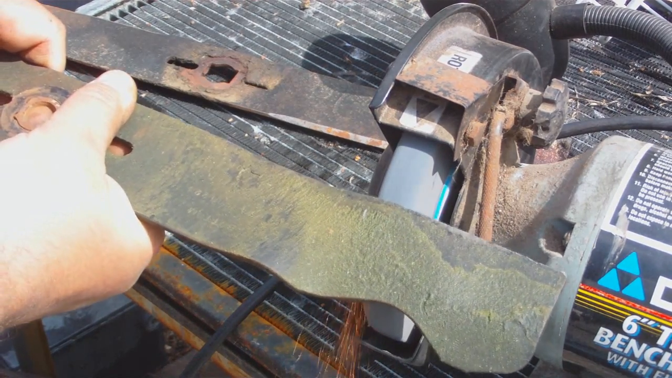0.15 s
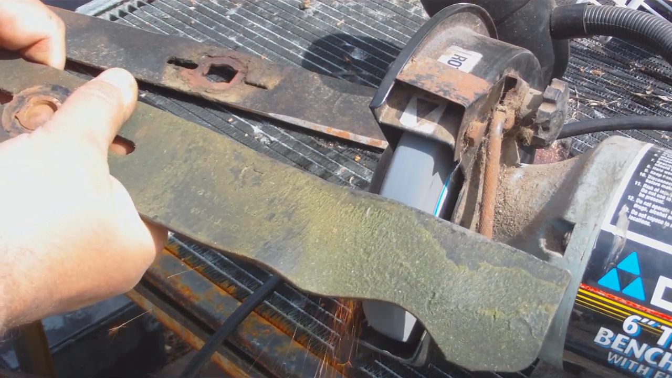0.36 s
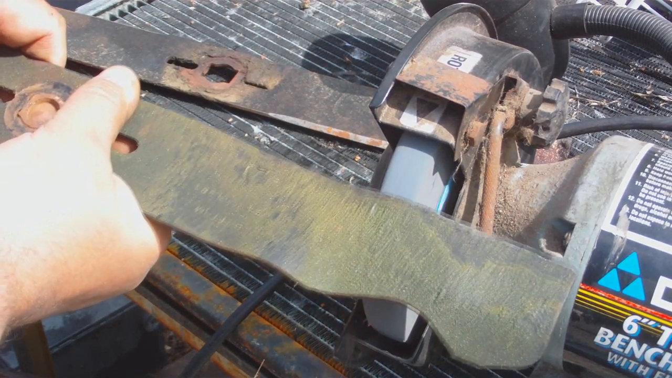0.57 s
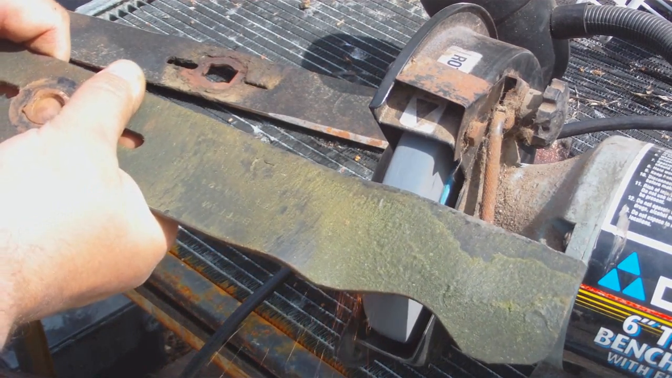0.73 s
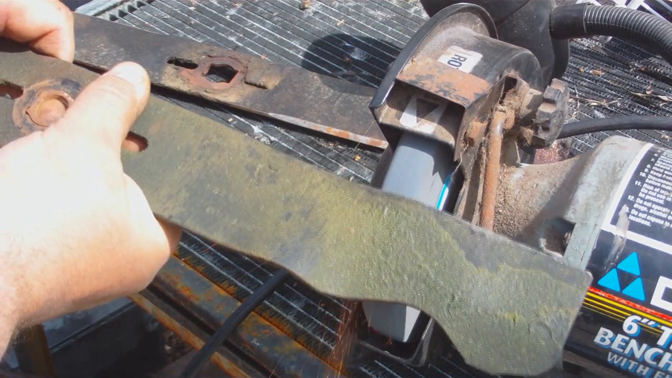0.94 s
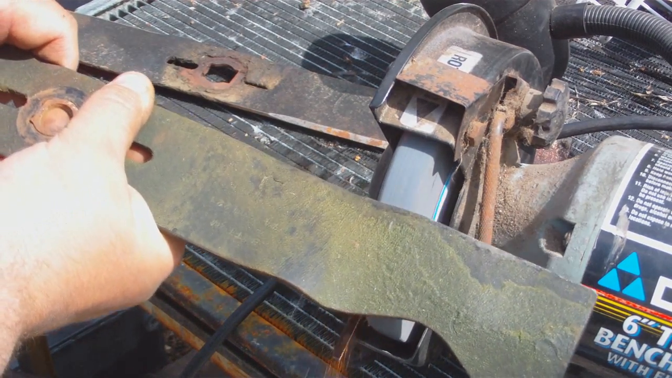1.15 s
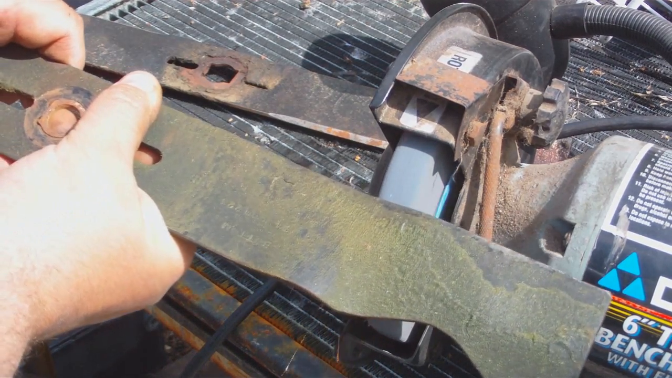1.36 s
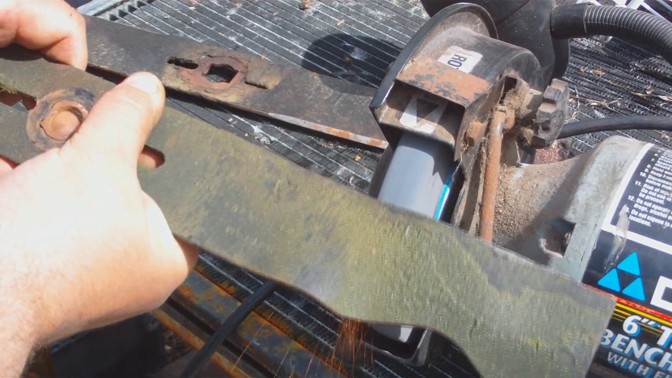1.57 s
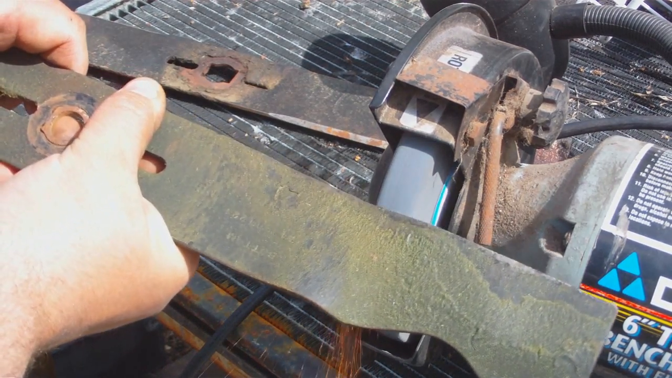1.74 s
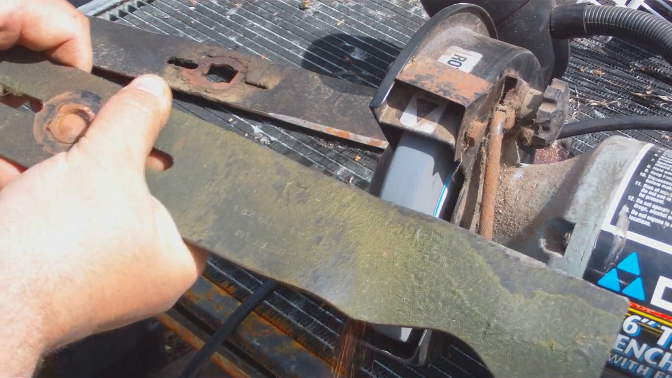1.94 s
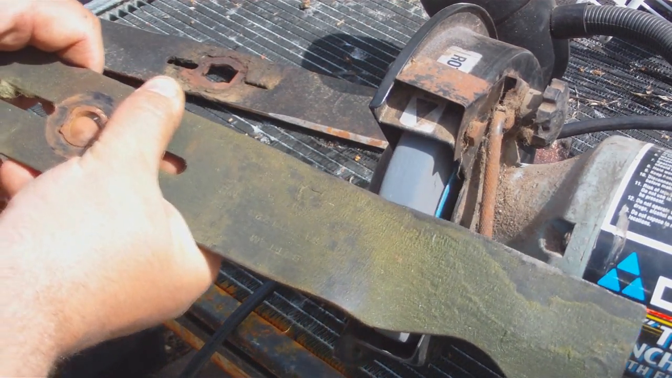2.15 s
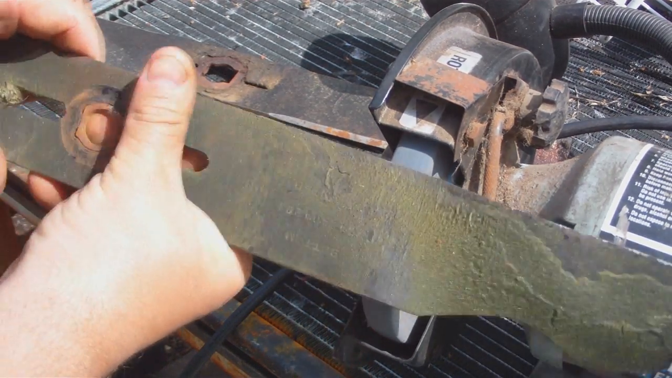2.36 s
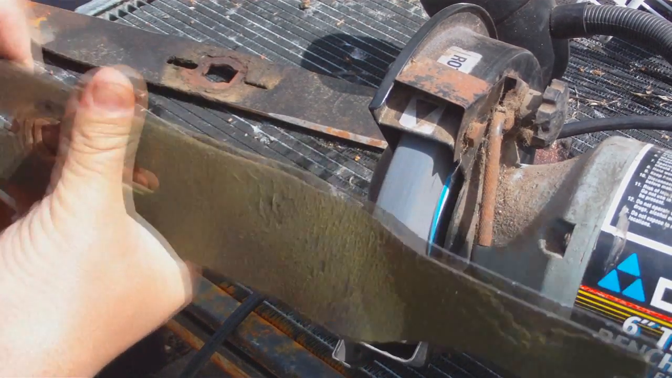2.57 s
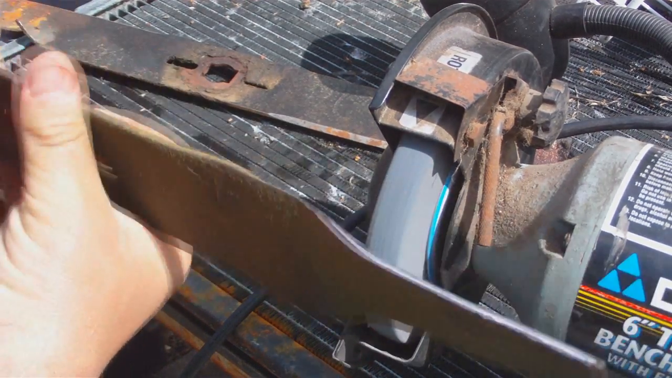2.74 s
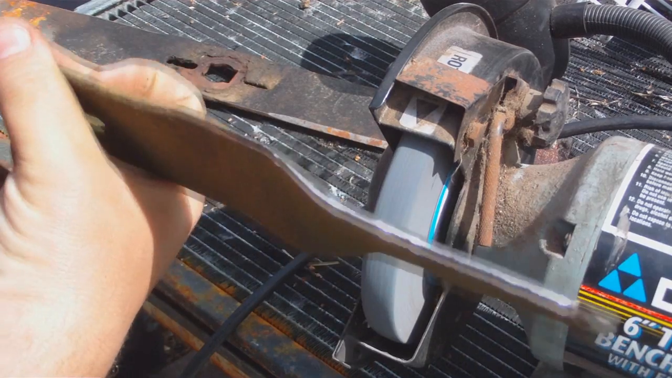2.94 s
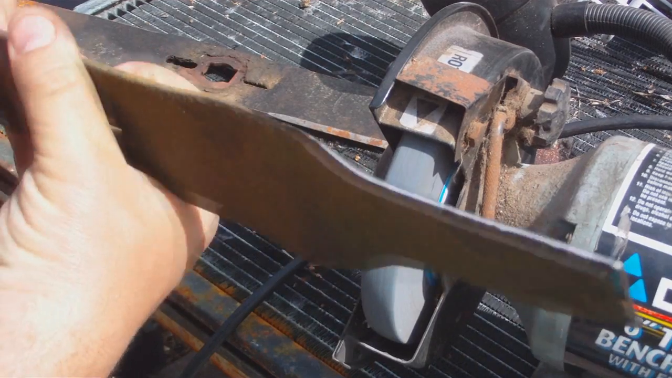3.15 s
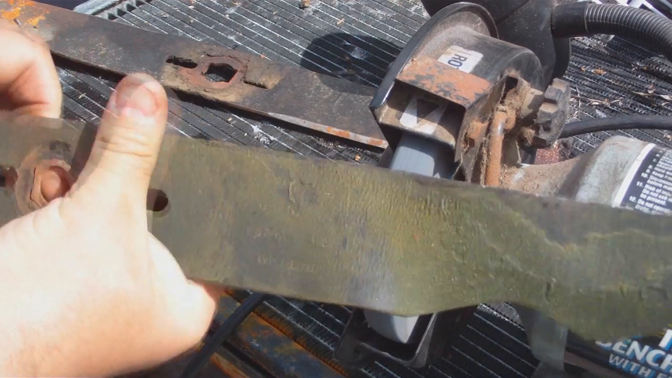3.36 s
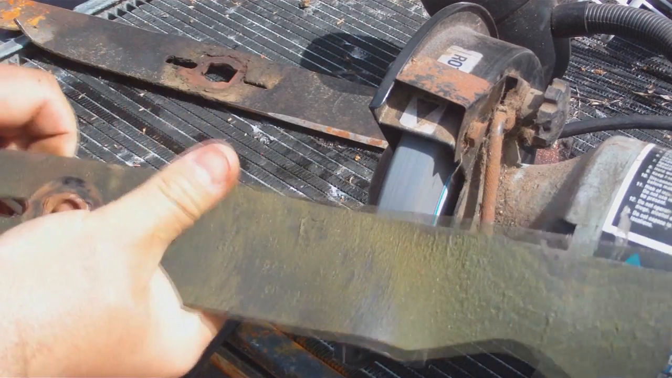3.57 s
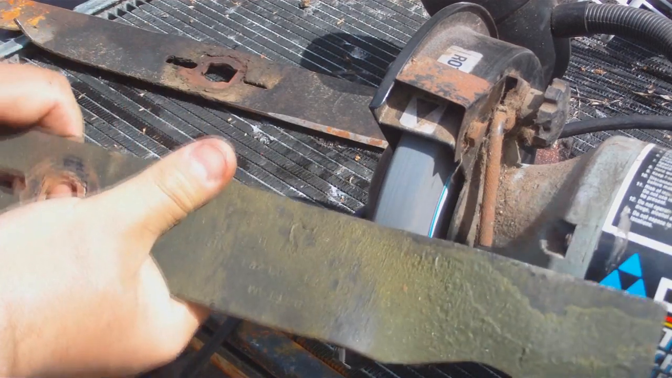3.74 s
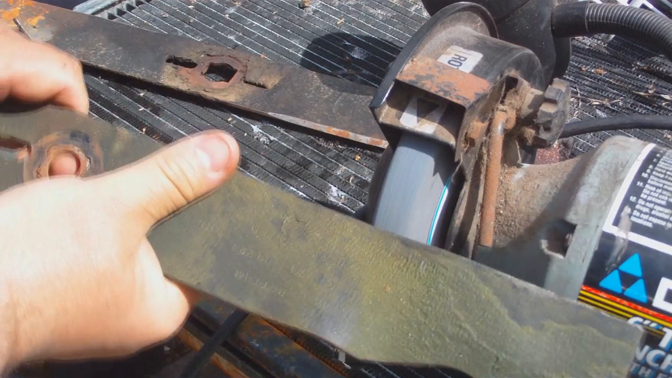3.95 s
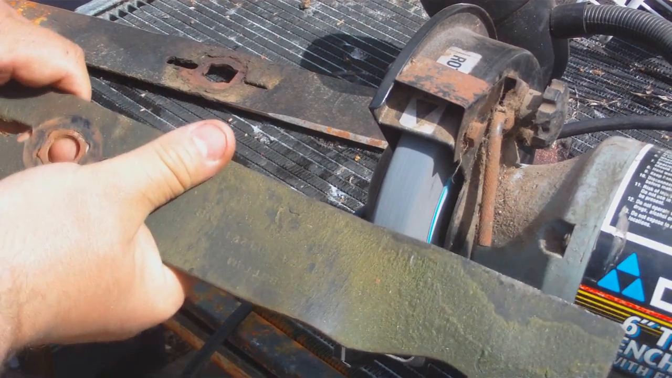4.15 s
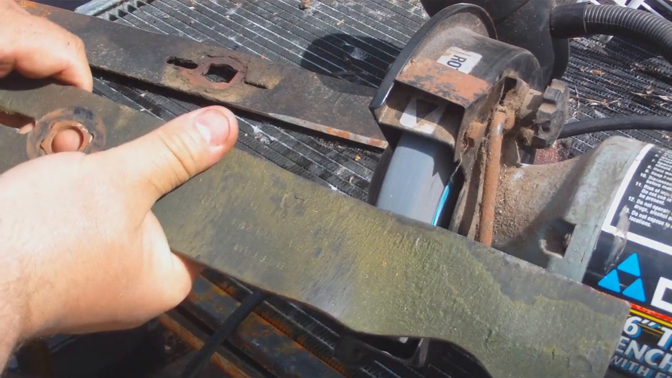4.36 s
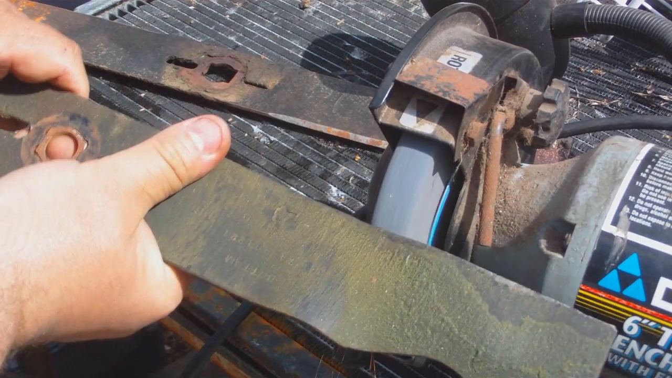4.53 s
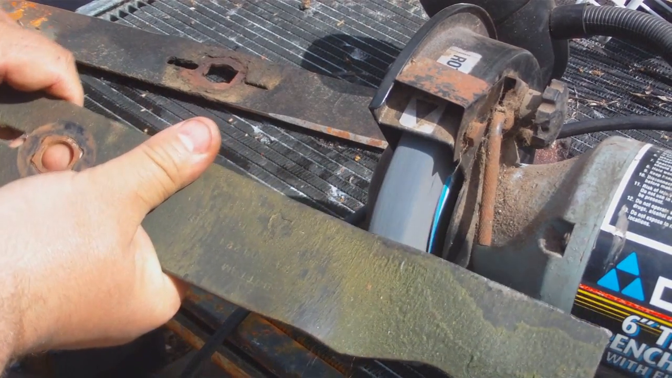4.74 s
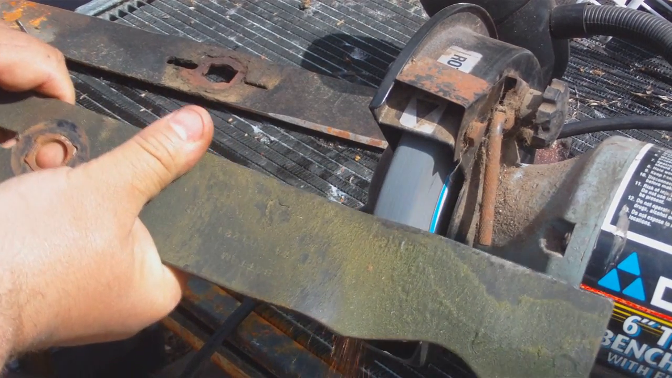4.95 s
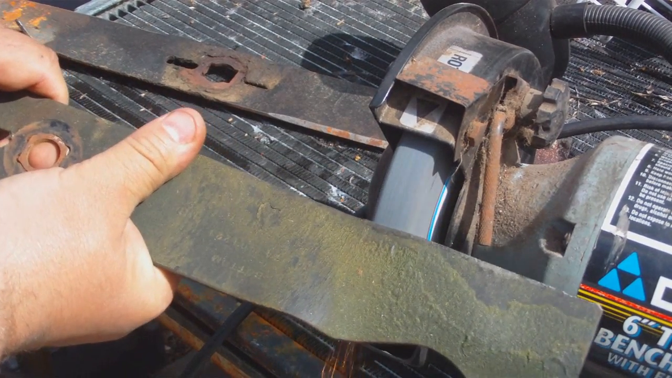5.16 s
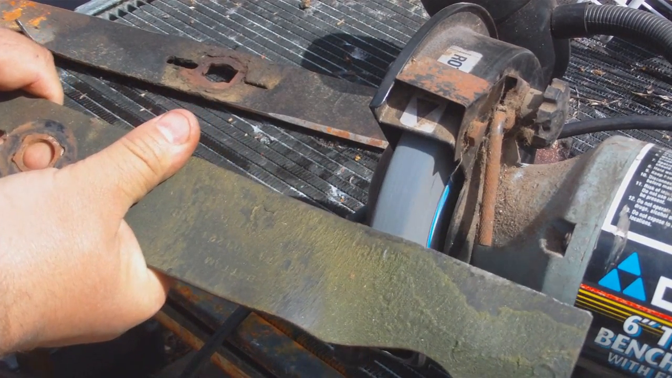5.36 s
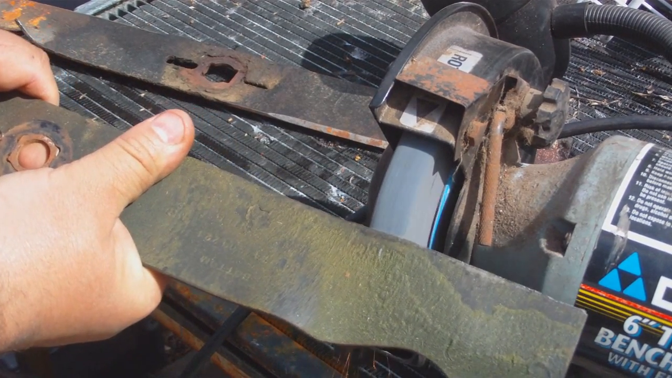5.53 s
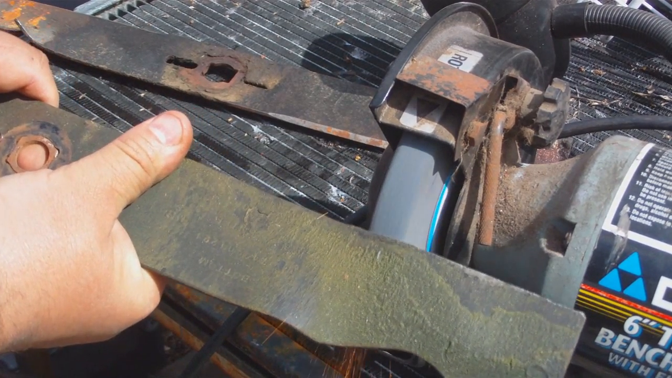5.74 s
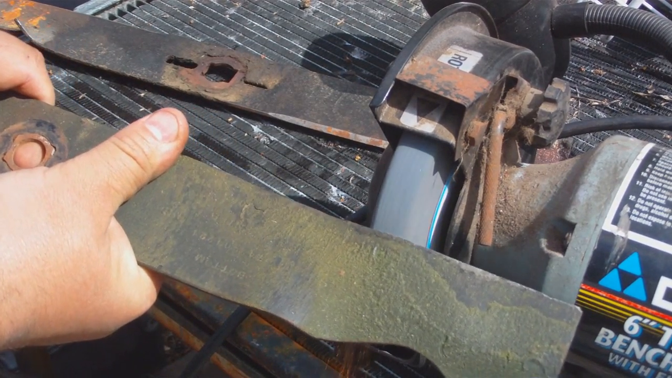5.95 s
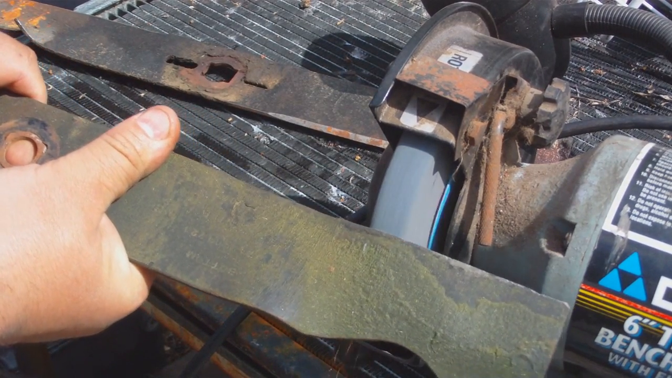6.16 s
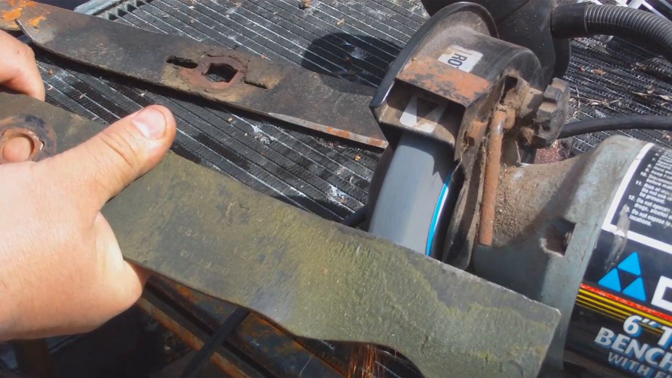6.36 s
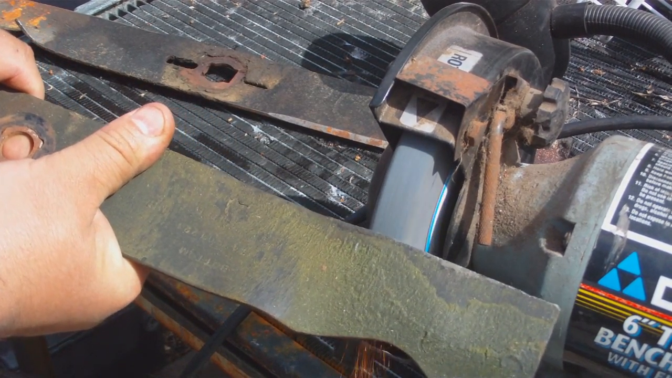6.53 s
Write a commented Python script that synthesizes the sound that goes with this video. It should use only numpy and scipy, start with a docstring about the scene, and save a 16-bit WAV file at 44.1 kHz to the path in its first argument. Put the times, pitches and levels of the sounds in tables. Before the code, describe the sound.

A steel blade grinds harshly on a bench grinder wheel, lifts off to leave the motor humming, then clatters back and grinds again.

```python
"""Sharpening a mower blade

A long steel blade is held to a bench grinder, outdoors and close to the microphone. The wheel is
slightly out of round, so the blade lands on it once a turn and the same grit scratches it into ringing.
Between two passes the motor runs free and the lifted blade bumps softly as it is handled, then bounces
as it comes back down. A light breeze buffets the microphone."""
import sys
import numpy as np
from scipy import signal
from scipy.fft import rfft, irfft
from scipy.io import wavfile
from scipy.ndimage import uniform_filter1d, map_coordinates

SR = 44100
rng = np.random.default_rng(int(sys.argv[2]) if len(sys.argv) > 2 else 0)


def digitize_waveform(pressure):
    """Quantize a signal to 16-bit integers and store it at the path in sys.argv[1].

    Rows of a 2-D input are taken as channels; values are limited to [-1, 1].
    """
    field = np.atleast_2d(pressure).T
    bounded = np.clip(field, -1, 1)
    quanta = np.round(bounded * 32767).astype(np.int16)
    wavfile.write(sys.argv[1], SR, quanta)


N = 291060
TIME = np.arange(N) / SR

# The wheel's speed, which sags under load: (time [s], speed [turns/s])
WHEEL_SPEED = [(0, 58.5), (.6, 58.4), (.8, 58.6), (2.35, 58.6), (2.5, 59.57), (4.5, 59.57), (4.75, 59.1),
               (5.3, 58.7), (5.75, 58.4), (6.6, 58.35)]
# Passes along the edge, where place 0 is the inner end and 1 is the tip: (start [s], end [s],
# relative level [dB], first place [0-1], last place [0-1], time to press home [s],
# landing angle once home [turns], rocking [0-1], extra ring of the gripped modes [dB])
GRINDING_PASSES = [(0, 2.335, -14, 0.012, 0.93, 0, .48, .4, -4.5),
                   (4.616, 6.6, -14, 0.74, 0.31, .72, .55, .15, 2)]
# Single knocks of the blade on the wheel: (time [s], relative level [dB], decay time [s])
BLADE_KNOCKS = [(2.354, 2, 0.0012), (2.379, -9, 0.0018), (2.393, -15, 0.0017), (4.502, 4, 0.00097),
                (4.5379, 3.5, 0.00069), (4.5678, -2.5, 0.0022), (4.5732, -1, 0.00067), (4.5909, -1, 0.0005),
                (4.6055, 3, 0.00078), (4.6236, 2.5, 0.00059), (4.874, -0.5, 0.0011), (4.923, -4, 0.0011),
                (4.994, -1, 0.0016)]
# The blade's modes, the tones it rings at: (pitch [Hz], width [Hz], then its relative level at
# each of four places from inner end to tip [dB])
BLADE_MODES = [(533, 60, -48, -46, -26.5, -12), (933.5, 25, -16.5, -18.5, -16.5, -16.5),
               (1042, 63, -15, -18, -19, -11), (1270.6, 53, -14, -13, -11.5, -10.5),
               (1463, 190, -12, -18.5, -13, -10), (2056, 100, -4, -5, -6, -4),
               (2238, 300, -11, -11, -10.5, -8.5), (2530, 53, -9, -11.5, -9.5, -13),
               (2816, 42, -18, -20.5, -8, -15), (3367, 36.6, -6, -4, -5.5, -13),
               (3945, 57, -5.5, -11, -19.5, -30), (4110, 125, -4.5, -7.5, -17, -53),
               (4466, 18, -13.5, -5.0, -19, -25), (4996, 79, -31, -10.5, -7, -4.5),
               (5224, 230, -30, -17.5, -6.5, -16), (5730, 93, -18, -10, -15, -17.5),
               (6224, 110, -12.5, -18, -16, -18), (6516, 70, -1, -11.5, -7, -10),
               (6830, 150, -7.5, -7, -14.5, -12.5), (7147, 146, -2, -1.5, -1.5, -16),
               (7320, 150, -2, -45, -12, 0), (7716, 290, -28, -37, 1, -4),
               (8160, 57, -21, -11.5, -3.5, -26), (8460, 66, -7, -7.5, -14, -10.5),
               (9997, 94, -9, -17.5, -6, -8), (11020, 120, -33.0, -33, -9, -10),
               (11030, 590, -13.5, -17.5, -3.5, -30), (12500, 150, -25.0, -29, -30.0, -38.0),
               (13484.0, 150, -39, -35.0, -27, -24), (14650, 110, -15, -34, -28, -23)]
# Modes that the grip damps or leaves free: (pitch [Hz], width [Hz], response to the grip [factor])
GRIP_BANDS = [(3365, 200, 0.51), (6600, 120, 3.7), (2800, 100, 0.46), (8310, 230, -0.55),
              (13484, 150, -1.6), (14650, 300, -0.5)]
# The balance of the ring, one curve a pass: (time [s], low modes [dB], treble modes [dB])
RING_BALANCE = [
    [(0.05, -31, -16.5), (0.21, -21.5, -27), (0.43, -24, -17.5), (0.6, -24, -25.5), (0.93, -26, -20),
     (0.98, -23.5, -24), (1.57, -23, -14), (1.68, -18.5, -18), (2.3, -30, -20)],
    [(4.62, -22, -15.5), (4.64, -28, -15.5), (4.834, -24.5, -18.5), (5.194, -26, -19),
     (5.324, -26.5, -29.5), (5.474, -27.5, -20.5), (5.818, -30.5, -20.5), (5.85, -27, -23.5),
     (6.55, -29, -19)],
]
# Quickly dying resonances of a sharp tap: (pitch [Hz], width [Hz], relative level [dB])
CRACK_MODES = [(5074, 150, 20), (8100, 2200, 8), (11160, 250, -18)]
# The grit's own dull rasp: (frequency [Hz], relative level [dB])
RASP_SPECTRUM = [(100, -100), (400, -6.5), (800, -7), (2000, 1.5), (4000, 2), (8000, -20), (11000, -17),
                 (15000, -12.5)]
# The steel's sound loses its highest treble: (frequency [Hz], relative level [dB])
STEEL_TREBLE = [(9000, 0.5), (11000, -1.5), (12500, 0), (15000, -4.5)]
# Housing resonances that the bearings rattle: (pitch [Hz], width [Hz], level [dB])
HOUSING_MODES = [(1414, 110, -40), (1900, 200, -50), (2995, 320, -46.5), (3400, 180, -50.5),
                 (3780, 67, -51.5), (4440, 40, -71), (5540, 380, -58), (7680, 81, -55), (8360, 27, -57.5),
                 (10430, 140, -53.5), (11430, 59, -51.5)]
# Air dragged round by the wheels: (frequency [Hz], relative level [dB])
AIR_SPECTRUM = [(15, -46), (25, -16), (107, -15), (204, -4.5), (227, -12), (433, -5), (509, -3.5),
                (582, 2.5), (1200, -12), (2010, -10.5), (2560, -19), (3530, -25), (5280, -30), (11500, -27),
                (15500, -50)]
# Buzz under load: (pitch [times wheel speed], relative level in pass one [dB], in pass two [dB])
LOAD_TONES = [(0.98, -53, -50.5), (3, -37, -37.5), (3.625, -43, -38), (4.03, -39, -42.5),
              (8.05, -33.5, -36.5), (8.94, -35, -42), (15.02, -34.5, -31), (16, -29.5, -40),
              (19.12, -31, -63), (22, -29, -45), (25, -48, -53)]
# Hum of the free-running machine: (pitch [times wheel speed], level [dB])
FREE_TONES = [(1, -50), (4, -44), (5, -51), (6, -44), (7, -42.5), (7.5, -42), (8, -47.5), (10, -42),
              (15, -45), (18.43, -47), (23, -48.5), (24, -53), (30, -52), (33, -51), (38.95, -54.5),
              (47, -56.5), (50, -48.5), (58, -47), (77, -60)]
# The rumble of wind on the microphone: (frequency [Hz], relative level [dB])
WIND_SPECTRUM = [(15, -21), (40, 4), (75, 5), (140, 2), (280, -6), (600, -46), (2000, -80)]
# Gusts of wind: (time of the peak [s], level [dB], half length [s])
WIND_GUSTS = [(.04, -38.5, 0.073), (0.297, -40.5, 0.15), (1.46, -38, .05), (2.123, -39.5, 0.13),
              (2.49, -37, .14), (4.1, -33, .05), (4.328, -40, 0.13), (4.62, -42.5, .16)]
# Dull bumps as the blade is handled: (time [s], level [dB], pitch [Hz])
HANDLING_BUMPS = [(3.301, -18, 80.4), (3.345, -17.5, 137), (4.07, -20.5, 70), (4.115, -22, 125)]

ATTACK_S, RELEASE_S = 0.0014, 0.014  # the steel bites, and comes clear
STROKE_EASE = 0.82  # 0 = the hand slides at one speed, 1 = it starts and ends at rest
PRESS_S, GRAZE_TURNS = .57, 1.02  # time for the weight to come on; landing angle before it does
GRAZE_DAMP_DB = 2  # the gripped modes ring less while the blade only grazes
HIGH_SPOT_TURNS = .89  # where the wheel bulges
ROCK_CHANGES_PER_S, ROCK_SPREAD = 5, .55  # the rocking comes and goes
TREMORS_PER_S, TREMOR_DB = 35, 0.38  # the hand's force is never quite steady
TILT_INNER_DB, TILT_TIP_DB = -0.5, -0.75  # brightness per octave at the two ends of the edge
LOW_TOP_HZ, TREBLE_FROM_HZ, MIDDLE_DB = 1700, 5900, -15  # the middle modes' range and relative level
CALM_DB, CALM_FALL_DB_PER_S = -46.5, -1.4  # the breeze between gusts slowly drops
EDDIES_PER_S, EDDY_DB = 24, 5


def amp(db):
    """Turns decibels into a gain."""
    return 10 ** (np.asarray(db) / 20)


def unit(x):
    """Scales a signal to an average (rms) level of 1."""
    return x / np.sqrt(np.mean(x ** 2) + 1e-20)


def follow(rows, t=TIME):
    """Reads every column of a curve at the times t."""
    times, *columns = np.transpose(rows)
    return [np.interp(t, times, column) for column in columns]


def local_rms(x, size):
    """The running average level over about size samples."""
    return np.sqrt(abs(uniform_filter1d(uniform_filter1d(x ** 2, size), size)) + 1e-12)


def colour(x, points):
    """Shapes the tone by (Hz, dB) points; white noise would keep its power."""
    hz, db = np.transpose(points)
    gain = amp(np.interp(np.log(np.fft.rfftfreq(N, 1 / SR) + 1), np.log(hz), db))
    return irfft(rfft(x) * unit(gain), N)


def drift(rate):
    """Smooth random wandering, about 1 in size, with rate changes a second."""
    knots = rng.standard_normal(400)
    coarse = TIME[::200]
    return np.interp(TIME, coarse, map_coordinates(knots, [coarse * rate], mode="mirror"))


def resonate(x, hz, width):
    """Rings one mode: the narrower its width, the longer it rings."""
    return signal.lfilter(*signal.iirpeak(min(hz, SR / 2 - 1), hz / width, SR), x)


def blows(times, sizes, decay):
    """The force of some blows: each rises at once and dies away."""
    force = np.zeros(N)
    inside = (times > 0) & (times < TIME[-1])
    np.add.at(force, (times[inside] * SR).astype(int), sizes[inside])
    return signal.lfilter([1], [1, -np.exp(-1 / (decay * SR))], force)


def roughness(angle, renewal, fresh, size=750):
    """A turning surface repeats every turn, wears anew renewal times a second and adds fresh noise."""
    tracks = rng.standard_normal((96, size))
    track, worn = np.divmod(TIME * renewal, 1)
    track, spot = track.astype(int), (angle * size).astype(int) % size
    old, new = tracks[track % len(tracks), spot], tracks[(track + 1) % len(tracks), spot]
    repeating = old * np.cos(worn * np.pi / 2) + new * np.sin(worn * np.pi / 2)
    return unit(repeating + fresh * rng.standard_normal(N))


def hand_stroke(t=TIME):
    """The hand presses the blade home and slides its edge across the wheel."""
    rows = np.array(GRINDING_PASSES)
    nearest = np.searchsorted((rows[:-1, 1] + rows[1:, 0]) / 2, t)
    start, end, db, first, last, home_s, seated, rocking, freed_db = rows[nearest].T
    gain = amp(db) * np.clip((t - start) / ATTACK_S, 0, 1) * np.clip(1 - (t - end) / RELEASE_S, 0, 1)
    done = np.clip((t - start) / (end - start), 0, 1)
    done += STROKE_EASE * (np.sin(np.pi / 2 * done) ** 2 - done)
    place = first + (last - first) * done
    grazing = np.clip((start + home_s - t) / PRESS_S, 0, 1) ** 2
    landing = seated + (GRAZE_TURNS - seated) * grazing
    return gain, place, landing, rocking, freed_db - GRAZE_DAMP_DB * grazing ** 2


def contact_force(angle):
    """Each turn the blade lands, rebounds, is struck by the high spot and drags on behind it."""
    turn = np.arange(-1, 400)
    when = lambda at: np.interp(turn + at, angle, TIME)  # the time each turn reaches this angle
    _, _, landing, rocking, _ = hand_stroke(when(0.9))
    wander = np.interp(when(0.89), TIME, drift(ROCK_CHANGES_PER_S))
    rocking = np.clip(rocking * (1 + ROCK_SPREAD * wander), 0, 1)
    pressed = np.clip((1.06 - landing) / 0.41, 0, 1)  # a lightly held blade is only tapped
    chance = rng.standard_normal((len(turn), 5)).T
    swing = rocking * (-1.) ** turn  # a rocking blade lands late and hard, then early and softly
    landing = landing + .09 * swing + 0.015 * chance[0]
    crest = np.maximum(HIGH_SPOT_TURNS + .005 * chance[1], landing + 0.015)
    land = blows(when(landing), amp(-2.5 + 2.8 * swing + 1.25 * chance[2]), decay=0.00082)
    rebound_size = pressed * amp(-2.5 + 1.9 * swing + 0.87 * chance[3])
    rebound = blows(when(landing + 0.13), rebound_size, decay=0.00061)
    strike = blows(when(crest), amp(-2.5 - swing + 0.92 * chance[4]), decay=0.0011)
    strike += blows(when(crest), pressed * amp(-20), decay=0.0013)
    drag = np.interp(TIME, when(1), pressed) ** 2 * amp(-24)
    return (land + rebound + strike + drag) * amp(TREMOR_DB * drift(TREMORS_PER_S))


def mode_shares(t):
    """The place of contact and the grip decide how much of the ring each mode gets."""
    _, place, _, _, freed_db = hand_stroke(t)
    mode_hz = np.transpose(BLADE_MODES)[0]
    tilt_db = TILT_INNER_DB + (TILT_TIP_DB - TILT_INNER_DB) * place
    shares = amp([np.interp(place, np.linspace(0, 1, len(dbs)), dbs) + tilt_db * np.log2(hz / 4000)
                  for hz, _, *dbs in BLADE_MODES])
    gripped = sum(reply * np.exp(-((mode_hz - hz) / width) ** 2) for hz, width, reply in GRIP_BANDS)
    shares *= amp(np.outer(gripped, freed_db))
    # balance the low, middle and treble modes as three groups
    low_db, treble_db = follow(np.vstack(RING_BALANCE), t)
    group = np.digitize(mode_hz, [LOW_TOP_HZ, TREBLE_FROM_HZ])
    for k, db in enumerate([low_db + 0.5, MIDDLE_DB, treble_db + 3]):
        shares[group == k] *= amp(db) / np.linalg.norm(shares[group == k], axis=0)
    return shares / np.linalg.norm(shares, axis=0)


def grit_scratch(angle):
    """Grit scratches the steel under the contact force; single knocks add bursts of noise."""
    gain, *_ = hand_stroke()
    grit = roughness(angle, renewal=3.2, fresh=0.4)
    scratch = contact_force(angle) * grit * abs(grit) ** 0.33  # a few tall grains cut deepest
    scratch *= gain / local_rms(scratch, size=3400)
    for s, db, decay in BLADE_KNOCKS:
        scratch += rng.standard_normal(N) * blows(np.array([s]), amp([db]), decay)
    return scratch


def steel_blade(scratch):
    """The scratched blade rings in its modes, over the dull rasp of the grit."""
    frames = TIME[::300]
    shares = mode_shares(frames)
    strength, ring = local_rms(scratch, size=6000), np.zeros(N)
    for k, (hz, width, *_) in enumerate(BLADE_MODES):
        mode = resonate(scratch, hz, width)
        mode *= strength / local_rms(mode, size=6000)
        ring += (-1) ** k * np.interp(TIME, frames, shares[k]) * mode  # neighbours swing opposite ways
    # a sharp tap also cracks, broad and bright, before the ring builds up
    _, _, landing, _, _ = hand_stroke()
    tapped = np.clip((landing - .6) / 1.12, 0, 1)
    crack = sum(amp(db) * resonate(scratch, hz, width) for hz, width, db in CRACK_MODES)
    rasp = amp(-12.5) * colour(scratch, RASP_SPECTRUM)
    return amp(1.07 - 1.4 * tapped) * ring + (0.097 + 0.68 * tapped) * crack + rasp


def bench_echoes(x, fade_s, size=4000):
    """Short echoes off the guard and the bench top, falling at 60 dB per fade_s."""
    t = np.arange(size) / SR
    echoes = rng.standard_normal(size) * (rng.random(size) < .06) * (t > .001) * amp(-60 * t / fade_s)
    return signal.oaconvolve(x, echoes / np.linalg.norm(echoes))[:N]


def shaft_hum(angle, tones, waver_db):
    """Tones locked to the turning shaft, each wavering in level."""
    return sum(np.sqrt(2) * amp(db + waver_db * drift(6.7))
               * np.sin(2 * np.pi * (multiple * angle + rng.random())) for multiple, db in tones)


def motor(angle):
    """The shaft hums and buzzes under load, bearings rattle the housing and air rushes off the wheels."""
    gain, _, landing, _, _ = hand_stroke()
    load = np.clip(local_rms(gain, size=4000) / amp(-14.5), 0, 1)
    bearings = roughness(angle, renewal=1, fresh=0.74)
    rattle = sum(amp(db) * unit(resonate(bearings, hz, width)) for hz, width, db in HOUSING_MODES)
    air = colour(roughness(angle, renewal=4, fresh=2.2), AIR_SPECTRUM) * amp(-29.5 + 0.88 * drift(22))
    first = shaft_hum(angle, [(multiple, db) for multiple, db, _ in LOAD_TONES], waver_db=1.2)
    second = shaft_hum(angle, [(multiple, db) for multiple, _, db in LOAD_TONES], waver_db=1.2)
    pressed = np.clip((1.05 - landing) / 0.29, 0, 1)
    buzz = load * np.where(TIME < GRINDING_PASSES[1][0], first, second) * pressed
    low_db, _ = follow(np.vstack(RING_BALANCE))
    buzz *= amp(0.44 * low_db + 7)  # the buzz swells with the blade's low bending modes
    hum = (1 - 0.57 * load) * shaft_hum(angle, FREE_TONES, waver_db=2.75)
    return buzz + hum + rattle + air


def wind():
    """Lumpy low buffeting at the microphone: gusts swell and fade over a light breeze."""
    breeze_power = amp(CALM_DB + CALM_FALL_DB_PER_S * TIME) ** 2
    gust_power = sum(amp(db) ** 2 * np.exp(-((TIME - s) / half) ** 2) for s, db, half in WIND_GUSTS)
    rumble = colour(rng.standard_normal(N), WIND_SPECTRUM)
    return rumble * np.sqrt(breeze_power + gust_power) * amp(EDDY_DB * drift(EDDIES_PER_S))


def handling():
    """Handling the blade makes soft thuds, each a low swing that dies in a few cycles."""
    age = lambda s: np.maximum(TIME - s, 0)
    return sum(amp(db) * np.sin(2 * np.pi * hz * age(s)) * np.exp(-age(s) / 0.013)
               for s, db, hz in HANDLING_BUMPS)


def scene():
    """Blade, machine, breeze and bumps, in one channel."""
    angle = np.cumsum(follow(WHEEL_SPEED)[0]) / SR  # in turns of the wheel
    steel = amp(-1.62) * colour(steel_blade(grit_scratch(angle)), STEEL_TREBLE)
    echoes = amp(-15.5) * bench_echoes(steel, fade_s=0.12)
    return (steel + echoes + motor(angle) + wind() + handling())[None]


def record(dry):
    """Rounds off the loudest peaks, then cuts the very highest treble."""
    ceiling, cutoff_hz = 0.78, 15500
    limited = dry / (1 + (abs(dry) / ceiling) ** 4) ** (1 / 4)
    lowpass = signal.firwin(255, cutoff_hz, window=("kaiser", 8), fs=SR)
    return signal.oaconvolve(limited, lowpass[None], "same")


dry = scene()
out = record(dry)
digitize_waveform(out)
```